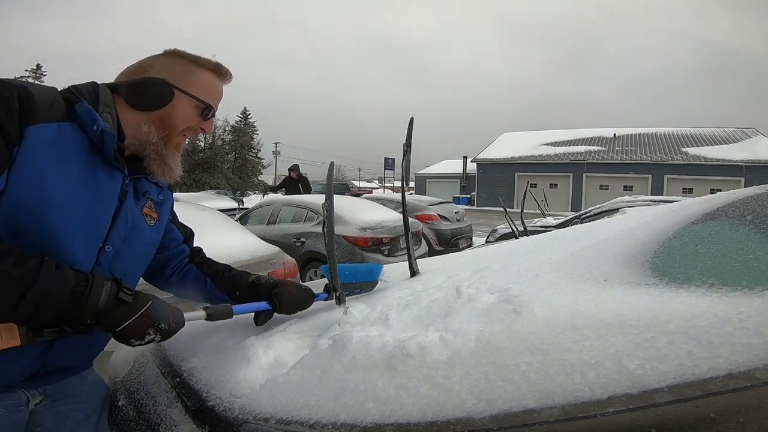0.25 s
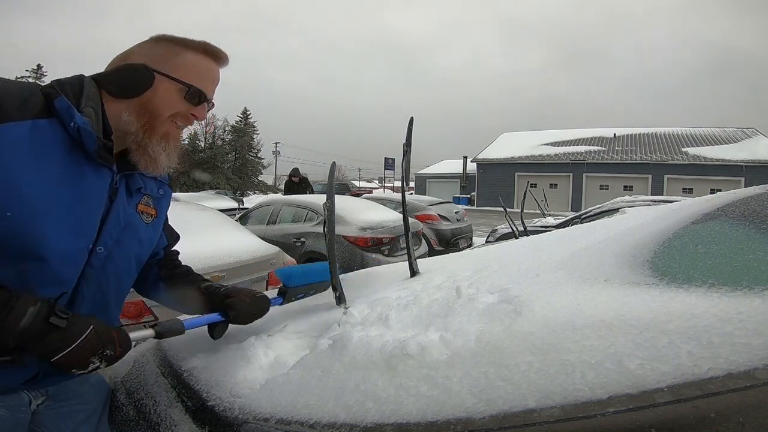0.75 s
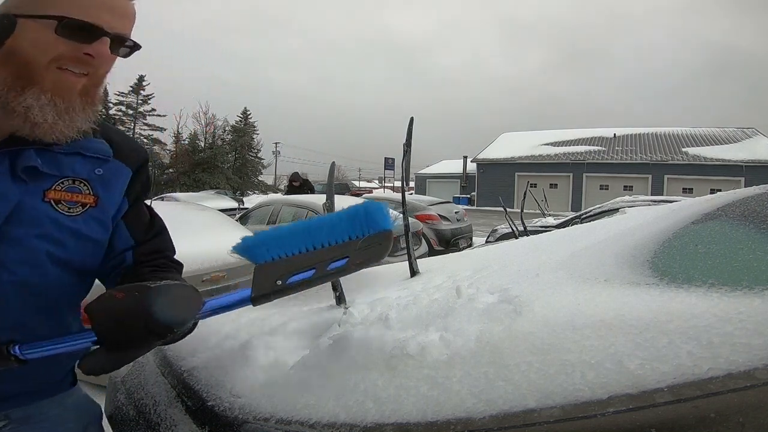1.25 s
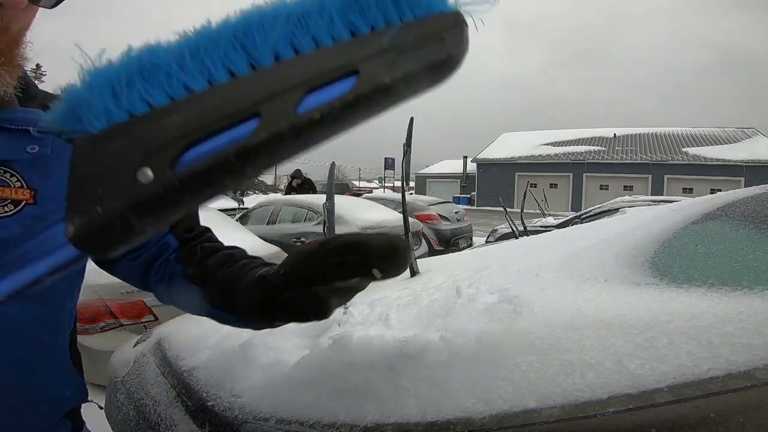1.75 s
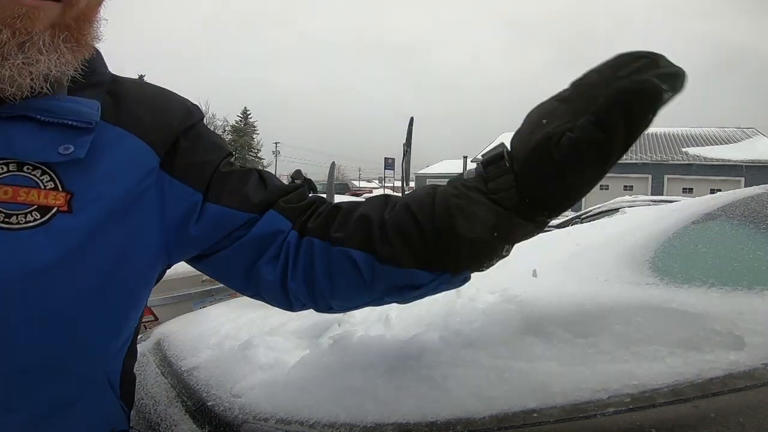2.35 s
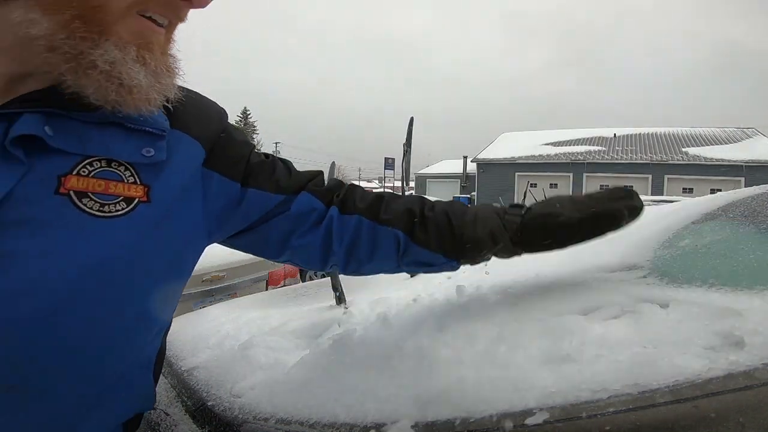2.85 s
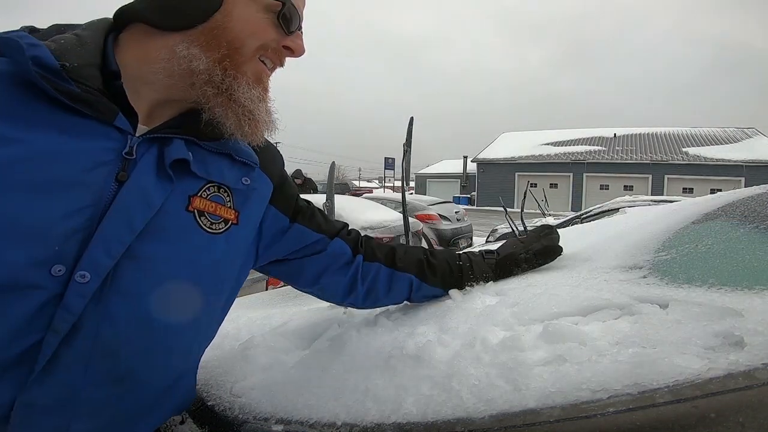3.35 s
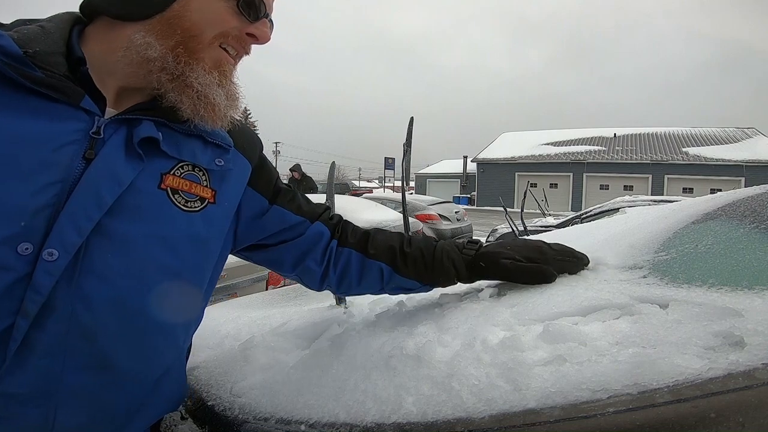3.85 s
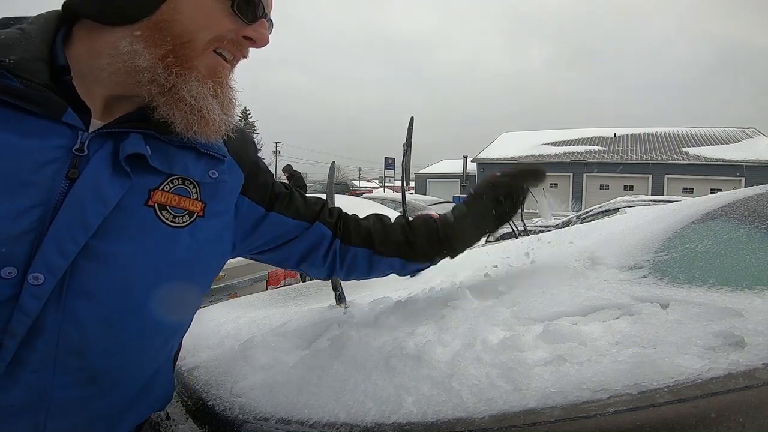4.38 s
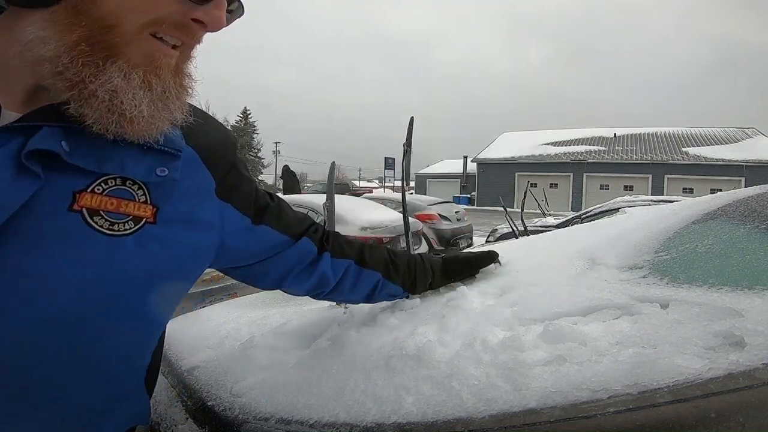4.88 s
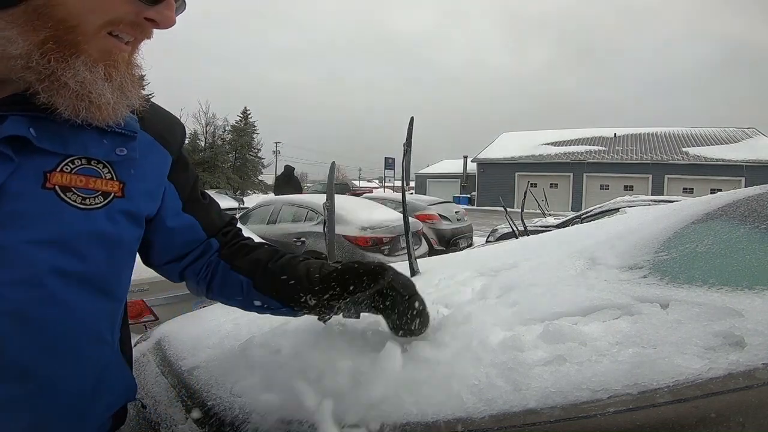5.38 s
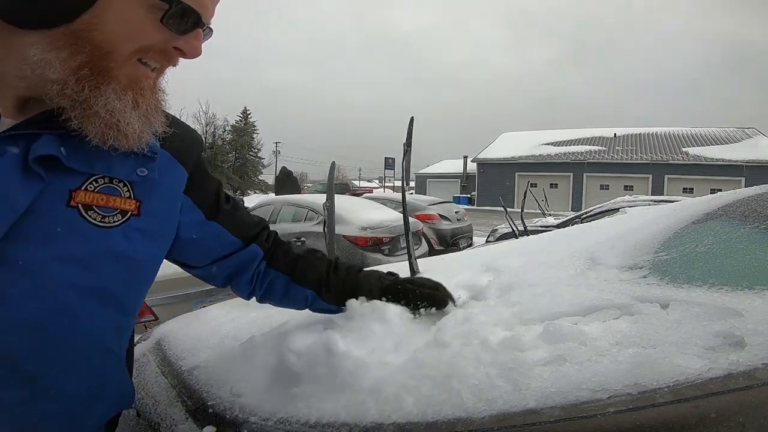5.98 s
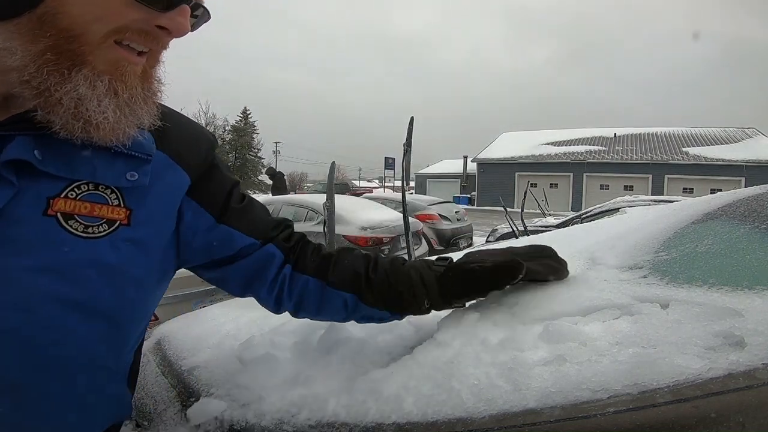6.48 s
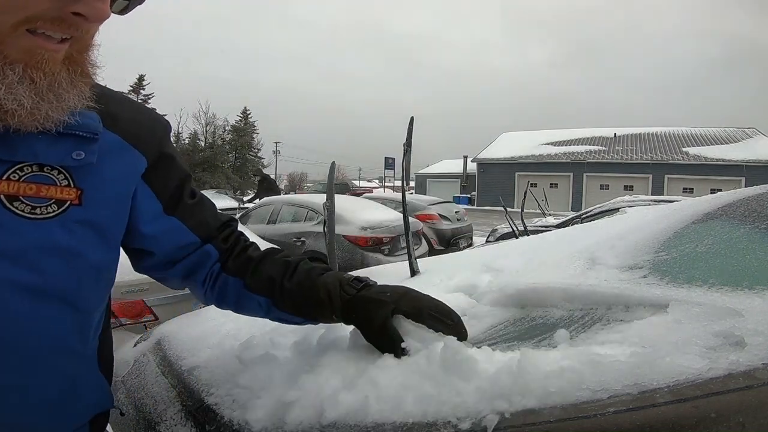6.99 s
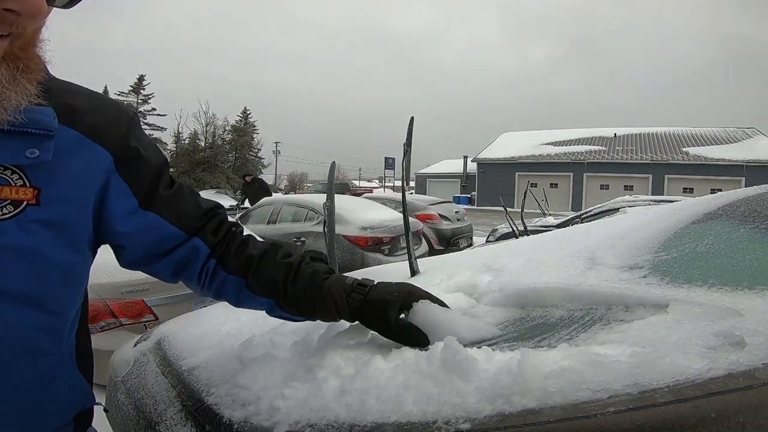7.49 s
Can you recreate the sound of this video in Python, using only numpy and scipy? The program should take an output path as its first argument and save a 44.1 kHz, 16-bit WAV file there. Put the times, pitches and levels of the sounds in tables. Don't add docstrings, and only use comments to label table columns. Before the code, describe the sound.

Close to a small microphone outdoors, a hard plastic scraper cracks ice on a car windshield four times in quick succession. Wind buffets softly through a short lull. Then a padded glove slaps the frozen crust six times, evenly spaced, each a loud crunchy crack with a dull panel thud and scattering ice bits. Finally the hand drags loose snow away in uneven, rasping, crackling strokes with a few light pats.

```python
import sys
import numpy as np
from scipy import signal
from scipy.fft import rfft, irfft, next_fast_len
from scipy.io import wavfile
from scipy.ndimage import uniform_filter1d, map_coordinates

SR = 44100
rng = np.random.default_rng(int(sys.argv[2]) if len(sys.argv) > 2 else 0)


def dump_mix(stems):
    frames = np.atleast_2d(stems).T
    limited = np.clip(frames, -1, 1)
    pcm = np.round(limited * 32767).astype(np.int16)
    wavfile.write(sys.argv[1], SR, pcm)


def gain_from_decibels(decibels):
    exponent = np.asarray(decibels, float) / 20
    return 10 ** exponent


N = 340893


def unit(x):
    return x / np.sqrt(np.mean(x ** 2) + 1e-20)


def peak(x):
    return x / np.abs(x).max()


def noise(count=N):
    return rng.standard_normal(count)


def sine(hz, t):
    return np.sin(2 * np.pi * hz * t)


def curves(rows):
    s, *columns = np.transpose(rows)
    return [np.interp(np.arange(N) / SR, s, column) for column in columns]


def wobble(rate):
    knots = noise(int(N * 60 / SR) + 4)
    return map_coordinates(knots, [np.arange(N) * min(rate, 59) / SR])


def coloured(x, spectrum):
    size = next_fast_len(len(x))
    hz, db = np.transpose(spectrum)
    log_hz = np.log(np.fft.rfftfreq(size, 1 / SR) + 1)
    gain = gain_from_decibels(np.interp(log_hz, np.log(hz + 1), db))
    return unit(irfft(rfft(x, size) * gain, size)[:len(x)])


def fall(t, t60, attack):
    return gain_from_decibels(-60 * t / t60) * (1 - np.exp(-t / attack))


def add(track, s, sound):
    part = track[round(s * SR):][:len(sound)]
    part += sound[:len(part)]


# (time [s], gust level [dB])
WIND = [(0, -26.5), (1.2, -34), (1.48, -39), (1.65, -41), (1.9, -19.5), (2.06, -34), (3.1, -31.5),
        (3.98, -50), (4.3, -34.5), (4.5, -42), (4.7, -29), (5.2, -40), (5.42, -24.5), (5.65, -48),
        (6.05, -36), (6.5, -66), (7.05, -38.5), (7.73, -33)]
# (frequency [Hz], density [dB per Hz])
PUSH = [(1.2, -8.5), (2.0, 5.5), (20, -3.5), (26, -24), (44, -120)]
# (frequency [Hz], density [dB per Hz])
FLUTTER = [(13, -3), (22, 4.5), (57, -8), (140, -29), (180, -34), (310, -120)]
# (frequency [Hz], density [dB per Hz])
AIR = [(130, -6), (220, 5), (649, -2), (1460, -2), (4630, -9), (5850, -12.5), (14900, -20), (16300, -38)]


def wind():
    gust_db, = curves(WIND)
    push_db = -18 + 0.34 * (gust_db - gust_db.mean())
    flutter_db = gust_db + 4 + 2.5 * wobble(rate=11)
    push = gain_from_decibels(push_db) * coloured(noise(), PUSH)
    flutter = gain_from_decibels(flutter_db) * coloured(noise(), FLUTTER)
    return push + flutter + gain_from_decibels(-57) * coloured(noise(), AIR)


# (middle [s], half length [s], level [dB], pitch [Hz])
CRUMBLES = [(0.6, 0.033, -48, 6500), (5.289, .004, -21.5, 4230), (5.02, 0.038, -37, 4200),
            (5.17, 0.098, -32, 2900), (6.561, 0.0058, -26, 4180), (6.3, .02, -37, 910),
            (6.395, 0.041, -32.5, 1100), (1.135, 0.0091, -44, 5500), (2.543, 0.032, -40, 1830),
            (2.872, 0.024, -46, 4500), (2.97, .03, -51, 2550), (3.041, 0.027, -43, 3500),
            (3.885, .03, -46.5, 9000), (3.99, 0.056, -45, 4060), (4.064, 0.042, -41, 2490),
            (6.945, .06, -50, 5000), (1.68, 0.047, -56, 2300), (3.676, 0.057, -36.5, 3970),
            (2.58, .12, -44.5, 2010), (2.875, .04, -41, 2220), (4.905, 0.076, -37, 4160),
            (5.121, 0.091, -35, 780), (5.243, 0.028, -33, 850), (5.525, 0.011, -27.5, 524),
            (6.272, 0.042, -39, 1510), (6.671, 0.13, -29.5, 1330), (7.451, 0.057, -43.5, 590),
            (7.674, 0.056, -39.5, 1050)]


def crumbles():
    out, t = np.zeros(N), np.arange(300) / SR
    for s, length, db, hz in CRUMBLES:
        when, tune, size = np.clip(rng.standard_normal((3, 90, 1)), -2, 2)
        f = hz * np.exp(0.19 * tune)
        wavelets = gain_from_decibels(7.8 * size) * sine(f, t) * np.exp(-t * f / 3.9)
        where = np.round(length / 2 * (when + 2) * SR).astype(int) + np.arange(len(t))
        lump = np.bincount(where.ravel(), wavelets.ravel())
        add(out, s - length, gain_from_decibels(db) * lump * np.sqrt(length * SR) / np.linalg.norm(lump))
    return out


# (frequency [Hz], density [dB per Hz])
SNAP = [(900, -6), (1600, -1), (4600, -0.5), (7000, -6.5), (11000, -9), (16000, -18)]
# (time [s], peak [dB], pitch [Hz])
SHARDS = [(0.3344, -33, 4300), (1.1338, -28.5, 2130), (1.5, -39, 1600), (2.152, -23, 3570),
          (2.3246, -27, 1630), (2.4628, -17, 2510), (2.4744, -29, 1820), (2.5092, -27, 1650),
          (2.5334, -34, 2180), (2.5426, -21, 1740), (2.5686, -17, 1720), (2.614, -16.5, 1980),
          (2.6354, -25, 2340), (2.6594, -24.5, 2020), (2.7561, -21.5, 1950), (2.8634, -18, 2230),
          (2.8764, -16, 4230), (2.9044, -20, 2190), (2.9462, -23, 3020), (3.1278, -20.5, 1480),
          (3.1398, -14.5, 4900), (3.1677, -13, 4460), (3.4421, -26, 2080), (3.4514, -21, 2660),
          (3.5149, -28, 2350), (3.6895, -11, 3400), (3.7055, -11.5, 4000), (3.8152, -25.5, 4500),
          (3.8616, -24.5, 4280), (4.0437, -16.5, 2920)]
# (time [s], peak [dB], pitch [Hz])
SNAPS = [(4.1984, -22, 2560), (4.7621, -17.5, 3340), (4.8623, -21.5, 4240), (5.2874, -13, 4000),
         (5.3323, -14.5, 4280), (5.4176, -17.5, 2530), (5.4311, -18, 2900), (5.4535, -13, 1590),
         (5.4839, -17, 3600), (5.4914, -14.5, 2800), (5.5672, -21, 3560), (5.6176, -20, 3350),
         (5.7947, -15, 2520), (5.8681, -15, 2980), (5.9319, -8, 2150), (5.9983, -8, 1660),
         (6.5605, -14, 3950), (6.5789, -9.5, 1840), (6.8169, -15.5, 2140), (7.0025, -21.5, 3360),
         (7.0539, -24, 3500), (7.1267, -15, 1760), (7.2235, -17, 4450)]
# (time [s], peak [dB], pitch [Hz])
SQUEAKS = [
    (2.8065, -26, 8400),
    (2.8214, -30, 8900),
    (2.835, -28, 9260),
    (2.855, -27, 9050),
    (2.878, -28, 8800),
    (2.8924, -29, 8500),
]
# (time [s], peak [dB], pitch [Hz])
SKITTERS = [(2.0835, -35, 3600), (2.4854, -38, 5000), (2.52, -26, 1700), (2.5514, -22, 1750),
            (2.6444, -26, 3000), (2.6514, -34, 1460), (2.6644, -31, 1500), (2.74, -31, 3030),
            (2.8709, -18, 4440), (2.8803, -17, 3000), (2.8887, -21, 3000), (2.9714, -21, 3500),
            (2.9844, -26, 2500), (3.0104, -16, 4000), (3.026, -31, 3630), (3.036, -22, 4500),
            (3.0927, -31, 2000), (3.207, -35, 3000), (3.2164, -37, 3000), (3.2301, -36, 3000),
            (3.2474, -29, 4290), (3.255, -27, 4000), (3.6, -36, 5000), (3.8844, -29, 4500),
            (3.9215, -24, 4360), (4.0164, -31, 2220), (4.06, -26, 2500), (4.0944, -34, 4070),
            (4.11, -35, 2490), (4.1244, -27, 1880), (4.174, -34, 3660), (4.1808, -29, 2500)]
# (time [s], peak [dB], pitch [Hz])
CRACKLES = [(4.79, -28, 942), (4.9916, -36, 1020), (5.009, -21, 1120), (5.3708, -20, 1070),
            (5.6176, -22, 3410), (5.6491, -20, 3280), (5.6664, -21, 3890), (5.6855, -19, 3330),
            (5.7384, -26, 1370), (5.7773, -18, 1160), (5.9223, -17, 2240), (5.9736, -10, 1640),
            (6.0447, -16, 4300), (6.0796, -24, 953), (6.1, -13, 926), (6.1204, -18, 1350),
            (6.1664, -28, 2190), (6.2123, -20, 3670), (6.3846, -12.5, 2900), (6.4857, -16, 4340),
            (6.5234, -24, 1710), (6.6002, -13, 1340), (6.653, -7, 1170), (6.6877, -15, 2300),
            (6.6968, -11, 1180), (6.767, -20, 4430), (6.7812, -16.5, 3250), (6.9112, -32, 926),
            (6.938, -30, 5000), (6.977, -31, 945)]
# (time [s], peak [dB])
FLECKS = [(0.495, -30), (2.3454, -31), (2.463, -21), (2.475, -28), (2.534, -25), (2.66, -29), (2.689, -24),
          (2.835, -29), (3.105, -28), (2.38, -34), (3.3872, -38), (3.79, -29), (3.836, -23), (6.1868, -28),
          (7.3836, -28)]
# (time [s], peak [dB], pitch [Hz], body [dB])
CLODS = [(0.1894, -25, 1690, -7), (0.8894, -39.5, 1440, 7), (1.5394, -33.5, 2160, -7),
         (1.6646, -28, 1500, -13), (2.1849, -44, 2500, -5), (2.2004, -29, 2210, -0.5),
         (2.9632, -17, 3250, -8), (3.0435, -20, 4270, -8), (3.0719, -21, 1660, -8), (3.1043, -29, 2520, -3),
         (3.5518, -31.5, 2100, -1.5), (5.7149, -14.5, 2250, -7.5), (5.8252, -20.5, 4470, 2),
         (5.8426, -11, 1490, -1.5), (6.0194, -15, 4380, -1.5), (6.2906, -14.5, 1910, -3),
         (6.337, -13.5, 1930, -5.5), (6.3964, -13, 2450, -4.5), (6.6772, -14.5, 2250, -8),
         (7.2654, -24, 1500, -7), (7.2804, -15.5, 1880, -5), (7.3562, -20.5, 1700, -6),
         (7.4394, -38, 3110, 9), (7.4614, -28, 2060, 6.5), (7.7285, -18, 2470, 9), (1.7928, -40, 2650, 4)]
# (time [s], peak [dB], pitch [Hz], body [dB])
SPLITS = [(0.586, -23, 5900, -25), (2.116, -2, 2260, 0.5), (2.221, -21, 1730, -18), (2.406, -21, 2670, -17),
          (2.436, -4, 2200, -1.5), (2.687, -35, 1780, -3), (3.161, -30, 4470, 0.5), (4.355, -11, 4530, -30),
          (5.94, -12, 2430, -12), (6.008, -14, 4340, -6), (6.262, -8, 1590, -4), (6.2514, -3, 2300, -12),
          (5.446, -22, 3800, -20), (5.543, -24, 1400, -8), (5.475, -25, 1300, -8)]


def crumbs():
    light_body_db = -20.5
    pieces = []
    for table, t60 in [(SHARDS, 0.02), (SNAPS, 0.022), (SQUEAKS, 0.041), (SKITTERS, 0.013), (CRACKLES, 0.013)]:
        pieces += [(*row, light_body_db, t60) for row in table]
    pieces += [(s, db, 7100, light_body_db, 0.0048) for s, db in FLECKS]
    for table, t60 in [(CLODS, 0.032), (SPLITS, 0.034)]:
        pieces += [(*row, t60) for row in table]
    landing = [(200, -35), (400, 12.0), (1300, 9.0), (1900, -19.5)]
    out, t = np.zeros(N), np.arange(SR // 16) / SR
    for s, db, hz, body_db, t60 in pieces:
        tilt = 0.45 * np.log2(hz / 2800)
        colour = [(f, g + tilt * np.log2(f / 2500) - 2 * np.log2(f / hz) ** 2) for f, g in SNAP]
        snap = gain_from_decibels(-4.5) * peak(coloured(noise(len(t)), colour) * fall(t, t60, 0.00055))
        ring = gain_from_decibels(-7.5) * sine(hz, t) * fall(t, 0.76 * t60, 0.00022)
        thump = peak(coloured(noise(len(t)), landing) * fall(t, 1.44 * t60, 0.00057))
        add(out, s, gain_from_decibels(db) * (snap + ring + gain_from_decibels(body_db - 0.35) * thump))
    return out


def grit(share, spread_db, life):
    chance = rng.random(N)
    size = np.minimum(rng.exponential(size=N), 1.6)
    hail = (chance < 900 / SR) * gain_from_decibels(spread_db * size)
    bursts = signal.lfilter([1], [1, -np.exp(-1 / (life * SR))], hail)
    return noise() * (1 + share * unit(bursts))


def crunch(centre_hz, spread, cycles, size_db, clump_db, count):
    start, chance = rng.random((2, count))
    hz = np.clip(centre_hz * np.exp(spread * noise(count)), 500, 14000)[:, None]
    t = np.arange(200) / SR
    size = gain_from_decibels(-size_db * np.log(chance + 0.019))[:, None]
    wavelets = size * sine(hz, t) * np.exp(-t * hz / cycles)
    where = (start * N).astype(int)[:, None] + np.arange(len(t))
    snaps = np.bincount(where.ravel(), wavelets.ravel(), N + len(t))[:N]
    return unit(snaps * gain_from_decibels(clump_db * wobble(rate=37)))


def patchy(x, patchy_db):
    z = signal.stft(x, nperseg=512)[2]
    field = uniform_filter1d(rng.standard_normal(z.shape), size=9, axis=0)
    field = uniform_filter1d(field, size=9, axis=1)
    return unit(signal.istft(z * gain_from_decibels(patchy_db * unit(field)), nperseg=512)[1][:N])


def strokes(table):
    t = np.arange(0, N + 32, 32) / SR
    drag, load = np.full((2, len(t)), 1e-10)
    for s, rise, drop, db, load_db in table:
        away = np.abs(np.where(t < s, (s - t) / rise, (t - s) / drop))
        power = gain_from_decibels(2 * (db - 21.5 * away ** 1.61))
        drag = drag + power
        load = load + power * gain_from_decibels(2 * load_db)
    return curves(np.transpose([t, 10 * np.log10(drag), 10 * np.log10(load)]))


def powder():
    out, t = np.zeros(N), np.arange(SR) / SR
    for s, *_ in SLAPS[:6]:
        add(out, s, gain_from_decibels(-52) * fall(t, 1.17, 0.041))
    return out


# (fastest at [s], rise [s], fall [s], drag [dB], load [dB])
STROKES = [(3.69, 0.078, 0.065, -30.5, -2), (3.86, 0.11, 0.17, -50.5, 11.5),
           (4.765, 0.012, 0.085, -32.5, -2.5), (4.9, 0.12, 0.14, -40, -12), (5.09, 0.15, 0.24, -28.5, 2),
           (5.28, 0.34, 0.1, -25.5, -24), (5.5, 0.16, 0.091, -36.5, -23), (5.62, 0.22, 0.26, -38, -19),
           (5.8, 0.28, 0.64, -35.5, 3), (5.95, 0.077, 0.21, -23.5, -11), (6.15, 0.18, 0.26, -32, -11),
           (6.39, 0.17, 0.13, -27, 0.5), (6.6, 0.19, 0.16, -24, -12), (6.72, 0.17, 0.31, -30.5, -21),
           (7.05, 0.21, 0.47, -40.5, -29), (7.2, 0.16, 0.26, -38, -1), (7.45, 0.17, 0.14, -47.5, 7),
           (7.71, 0.66, 0.074, -46, -9)]
# (fastest at [s], rise [s], fall [s], drag [dB], load [dB])
JOLTS = [(4.79, 0.013, 0.034, -51, -5), (4.93, .03, 0.039, -38, -12), (5.055, 0.051, .04, -26.5, -2),
         (5.25, 0.051, 0.028, -28, -14), (5.34, 0.076, 0.027, -37, -9), (5.945, 0.023, .03, -21.5, -13),
         (6.015, 0.052, 0.035, -21, -7), (6.05, .015, 0.021, -26, -8), (6.125, 0.061, 0.045, -26.5, -11),
         (6.295, 0.012, 0.022, -31, -2), (6.392, 0.033, 0.022, -27, 0), (6.525, 0.053, 0.022, -28.5, -8),
         (6.605, 0.027, .03, -27, -6), (6.7, .04, 0.028, -24, -21), (6.785, .02, 0.03, -34, -7),
         (6.84, .04, 0.061, -30, -19), (3.97, 0.094, 0.053, -49, -12), (4.08, 0.031, 0.014, -50, -2),
         (2.215, .025, .03, -38, -1), (5.58, .02, .04, -36, -15), (5.16, .1, .1, -30, -5)]
# (fastest at [s], rise [s], fall [s], drag [dB], load [dB])
SLIDES = [(0.01, 0.12, 0.24, -47, 5), (.21, 0.14, 0.094, -43, 6), (.42, 0.1, 0.068, -45.5, 11),
          (.63, 0.13, 0.13, -50.5, 11), (1.14, 0.5, 0.45, -54.5, -20), (1.38, 0.2, 0.066, -53.5, -7),
          (1.51, 0.11, 0.068, -44, -13), (1.672, 0.016, 0.054, -41, -5), (1.75, 0.042, 0.32, -50, -3),
          (2.2, 0.03, 0.1, -48.5, 17.5), (2.57, 0.27, .12, -50, -25), (2.87, 0.2, 0.6, -47.5, -27),
          (3.04, 0.021, 0.036, -35.5, 3), (3.12, 0.11, 0.096, -47.5, 8), (3.25, 0.03, 0.048, -48, -3.5),
          (3.349, 0.12, 0.12, -49.5, 10.5), (4.06, 0.19, 0.11, -36.5, -4.5), (4.27, 0.38, 0.1, -47.5, 0),
          (4.45, 0.072, .3, -53, 2), (1.0, .1, .1, -56, -5)]
# (frequency [Hz], density [dB per Hz])
RASP = [(650, -4.5), (1100, -2), (1150, 0), (1410, -4), (3140, -5), (3450, -6.5), (3870, -0.5),
        (4800, -3.5), (5600, -17), (6200, -19), (8060, -23), (13600, -120)]
# (frequency [Hz], density [dB per Hz])
SLUMP = [(70, -30), (120, 2), (400, -2.5), (1000, -8.5), (1350, -15), (1900, -39)]
# (frequency [Hz], density [dB per Hz])
FIZZ = [(3530, -2.5), (6000, -9.5), (10800, -8.5), (15100, -23), (16100, -20), (16300, -57)]


def sweep():
    rasp_db, slump_db = strokes([*STROKES, *JOLTS, *SLIDES])
    drag = 1.76 * wobble(rate=50)
    grains = grit(share=1.7, spread_db=11.5, life=0.0018)

    catch = gain_from_decibels(1.8 * wobble(rate=28)) * patchy(coloured(grains, RASP), patchy_db=1.8)
    rasp = gain_from_decibels(rasp_db - 8.0 + drag) * catch

    fizz_db, grows = -48.5, 0.64
    glove_fizz = gain_from_decibels(grows * strokes([*STROKES, *JOLTS])[0])
    sleeve_fizz = gain_from_decibels(grows * strokes(SLIDES)[0] - 8)
    fizz_gain = gain_from_decibels(fizz_db + 39.44 * grows) * (glove_fizz + sleeve_fizz) + powder()
    hiss = coloured(grains + 1.5 * noise(), FIZZ)
    fizz = fizz_gain * gain_from_decibels(5.0 + drag + 0.15 * wobble(rate=9.8)) * hiss

    soft = coloured(grit(share=0.66, spread_db=-2.0, life=0.0066), SLUMP)
    slump = gain_from_decibels(slump_db - 5.0 + drag + 1.34 * wobble(rate=24)) * soft
    snaps = crunch(centre_hz=2750, spread=0.61, cycles=1.5, size_db=3.5, clump_db=1.0, count=9000)
    return rasp + fizz + slump + gain_from_decibels(rasp_db - 7.0) * snaps


def crush(t, t60, colour, crack_db, debris_db, rise):
    crack = fall(t, 0.012, 0.0001) * (1 - np.exp(-(t / rise) ** 3))
    shape = gain_from_decibels(crack_db) * crack + fall(t, t60, rise) + gain_from_decibels(debris_db) * fall(t, 0.28, 0.0083)
    lumps = gain_from_decibels(2.5 * unit(uniform_filter1d(noise(len(t)), size=60)))
    return peak(coloured(noise(len(t)), colour) * shape * lumps)


def panel_body(t, t60):
    hit = noise(len(t))
    knock = coloured(hit, [(190, -48), (300, 6), (1200, -5.0), (2200, -36.0)])
    hum = coloured(hit, [(190, -48), (330, 11), (1300, -35)])
    return peak(knock * fall(t, t60, 0.0014) + gain_from_decibels(-16.5) * hum * fall(t, 0.13, 0.0021))


def panel_thud(t, hz, squeeze):
    cycles = hz * (t + squeeze * 0.0079 * (1 - np.exp(-t / 0.00065)))
    return sine(1, cycles) * fall(t, 0.073, 0.0016)


# (frequency [Hz], level [dB], t60 [s])
GLASS = [(56.4, 1, 0.52), (88.7, 6.5, 0.45), (124.4, -2, 0.67), (210.7, 5, 0.14), (252.4, -1, 0.21),
         (352, 2, 0.072), (436, -21, .5), (540, -20, 0.34)]


def glass_modes(t):
    out = np.zeros(len(t))
    for hz, db, t60 in GLASS:
        out += gain_from_decibels(db + rng.normal(0, 2.8)) * sine(hz, t) * fall(t, t60, 0.0065)
    return out


def blows(table, colour, crack_db, debris_db, thud_db, ring_db, squeeze, dull, rise):
    out, t = np.zeros(N), np.arange(SR // 2) / SR
    before = SR // 50
    for s, db, low_db, hz, body_db in table:
        t60 = 0.043 - 0.0052 * db
        tilt = dull * (max(low_db, -23) + 21.5)
        muffled = [(f, g - tilt * np.log2(1 + f / 4000)) for f, g in colour]
        ice = gain_from_decibels(db + 3.0) * crush(t, t60, muffled, crack_db, debris_db, rise)
        body = gain_from_decibels(db + body_db + 6) * panel_body(t, t60)
        low = gain_from_decibels(thud_db) * panel_thud(t, hz, squeeze) + gain_from_decibels(ring_db) * glass_modes(t)
        add(out, s, ice + body + gain_from_decibels(db + low_db) * low)
        packing = gain_from_decibels(db - 30 - 60 * t[:before] / 0.02)[::-1]
        add(out, s - before / SR, packing * coloured(noise(len(t)), colour)[:before])
    return out


# (time [s], peak [dB], thud [dB], thud pitch [Hz], body [dB])
CHIPS = [
    (0.1593, -7, -17.5, 105, -12.5),
    (0.3044, -11.5, -27, 159, -31),
    (0.374, -2, -16, 150, -14.5),
    (0.5643, -10, -14.5, 110, -12.5),
]
# (frequency [Hz], density [dB per Hz])
EDGE = [(530, -9.5), (900, -7), (1750, -4), (2070, -1.5), (2830, -4), (5890, -1.5), (6970, -9),
        (11300, -14.5), (16000, -37)]


def scraper():
    return blows(CHIPS, EDGE, crack_db=11.5, debris_db=-24, thud_db=7.0, ring_db=-5.5,
                 squeeze=0.14, dull=0.03, rise=0.00027)


def last_ring():
    t = np.arange(N) / SR
    out = gain_from_decibels(-23) * sine(262, t) * fall(t, 0.1, 0.0031)
    out += gain_from_decibels(-31.0) * sine(128, t) * fall(t, 0.55, 0.003)
    add(out, CHIPS[1][0], gain_from_decibels(-22.0) * sine(4150, t) * fall(t, 0.056, 0.0019))
    return out


# (time [s], peak [dB], thud [dB], thud
# pitch [Hz], body [dB])
SLAPS = [(2.1096, 5, -22, 106, -12.5), (2.4306, 3, -24.5, 170, -14.5), (2.705, -2, -20, 173, -4.5),
         (2.998, -2, -10.5, 180, -6.5), (3.3046, -1.5, -13, 157, -7), (3.6103, 0, -12, 135.6, -6.5),
         (4.3492, -15.5, -24.5, 105, -20), (5.5146, -13, -27, 270, -26), (6.2509, -12, -37, 290, -25),
         (7.7215, -45, 14, 36.4, 22), (2.199, -29.5, -20, 130, -3), (1.491, -49, 3, 124, -20)]
# (frequency [Hz], density [dB per Hz])
PALM = [(530, 0), (900, 0.5), (1790, 1.5), (2330, -0.5), (2930, -4.5), (4630, -6), (7230, -22),
        (10500, -13.5), (16000, -47)]


def glove():
    return blows(SLAPS, PALM, crack_db=17.5, debris_db=-46.0, thud_db=16.5, ring_db=-6,
                 squeeze=0.29, dull=0.56, rise=0.002)


def scene():
    background = wind() + crumbles() + crumbs()
    return (background + sweep() + scraper() + last_ring() + glove())[None]


def top_cut(x):
    return signal.sosfilt(signal.butter(12, 16480, fs=SR, output="sos"), x)


def record(dry):
    top = 0.91
    rounded = dry / (1 + np.abs(dry / top) ** 6) ** (1 / 6)
    lowpass = signal.butter(16, 16100, fs=SR, output='sos')
    mix = signal.sosfiltfilt(lowpass, rounded)
    return top_cut(mix)


dry = scene()
out = record(dry)
dump_mix(out)
```